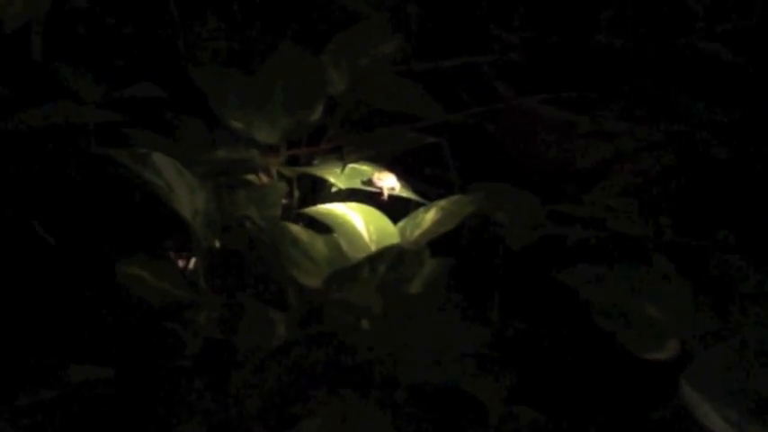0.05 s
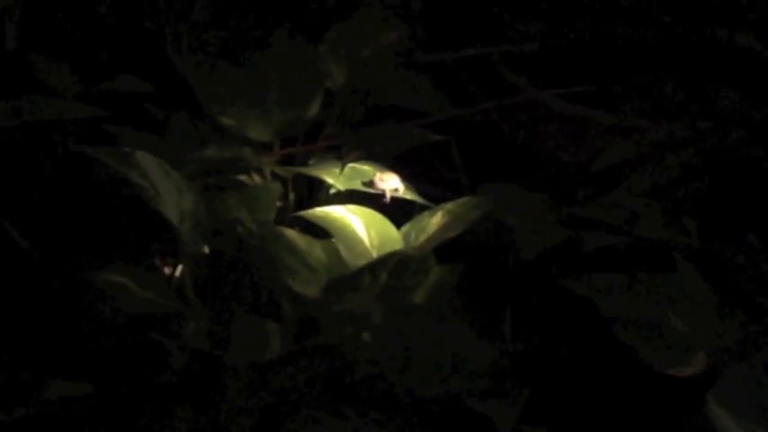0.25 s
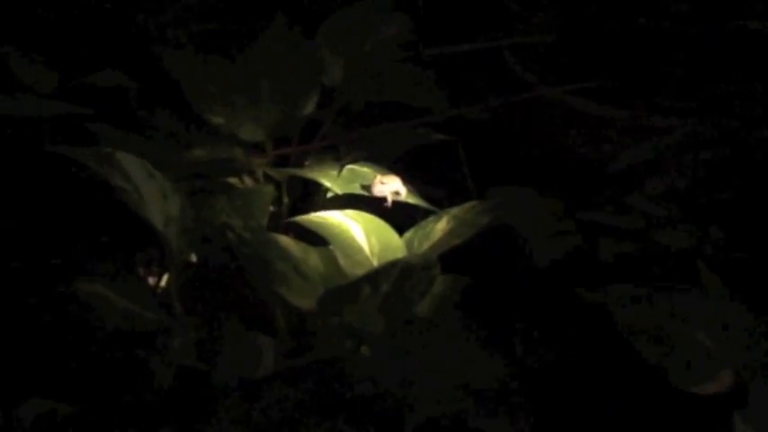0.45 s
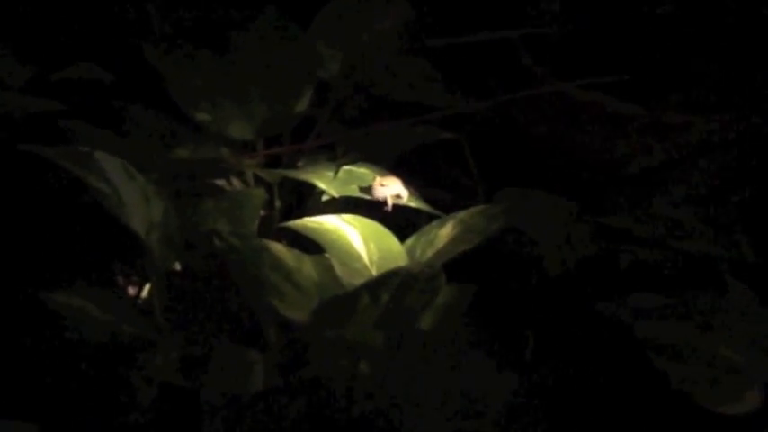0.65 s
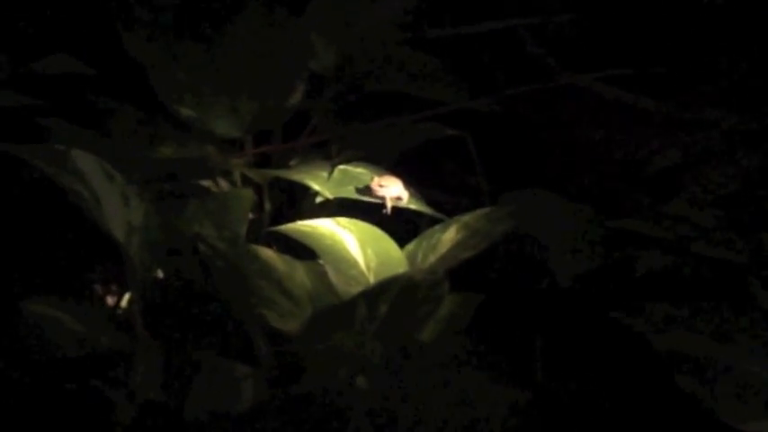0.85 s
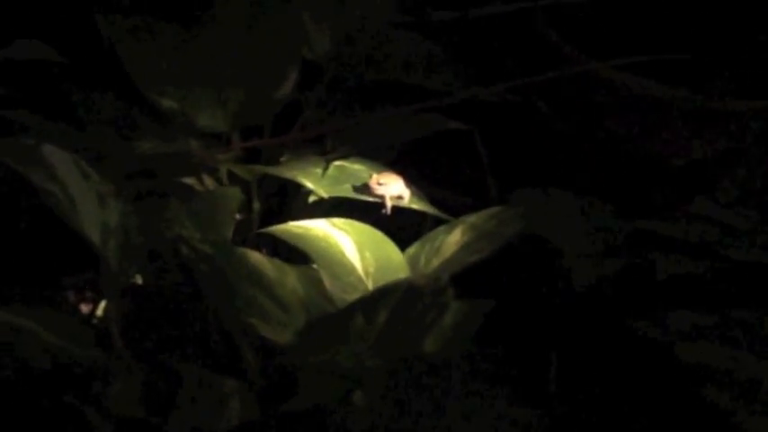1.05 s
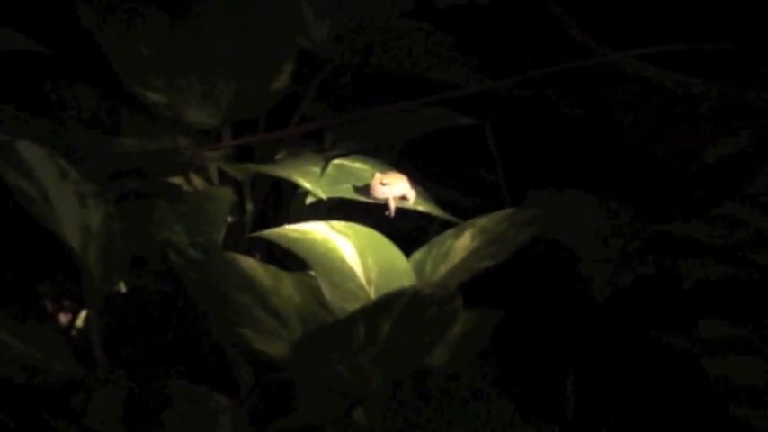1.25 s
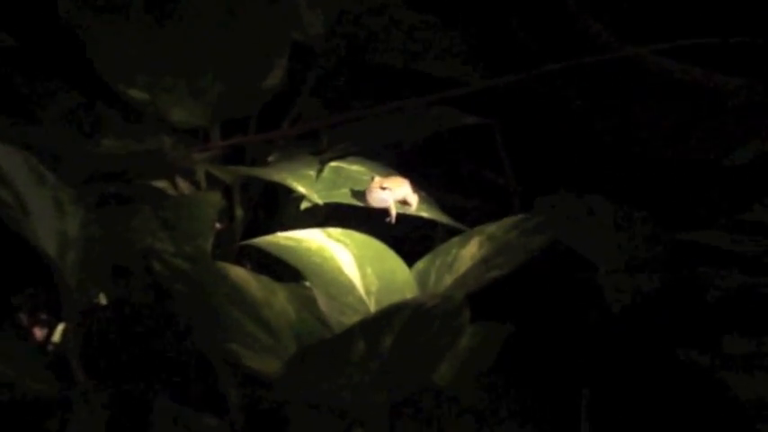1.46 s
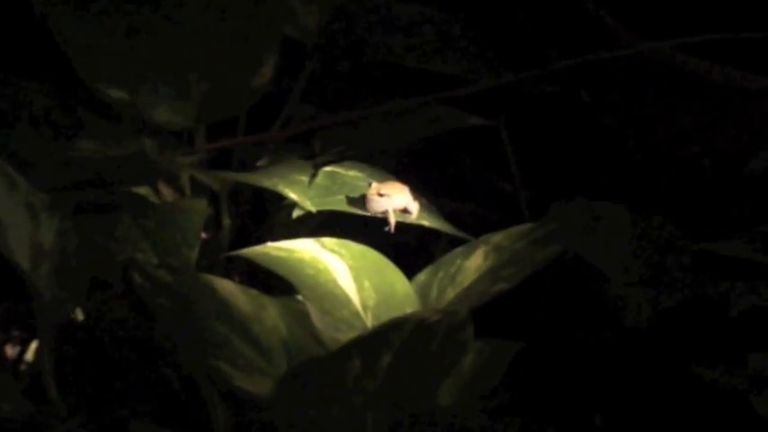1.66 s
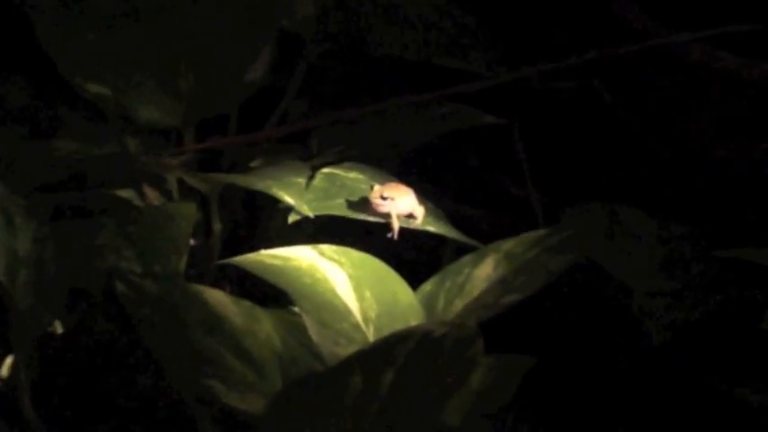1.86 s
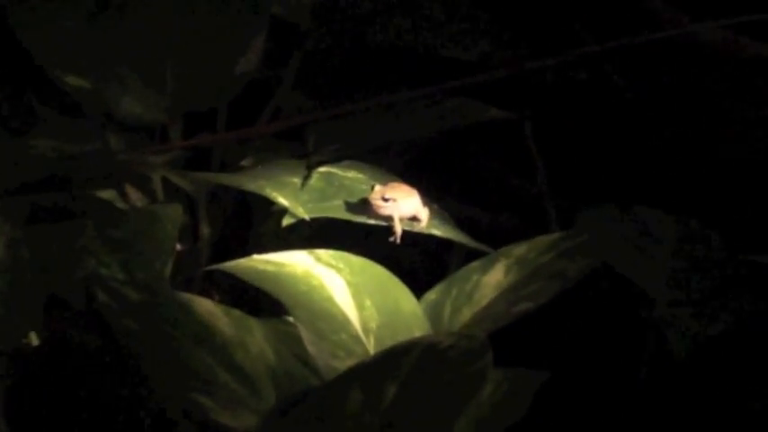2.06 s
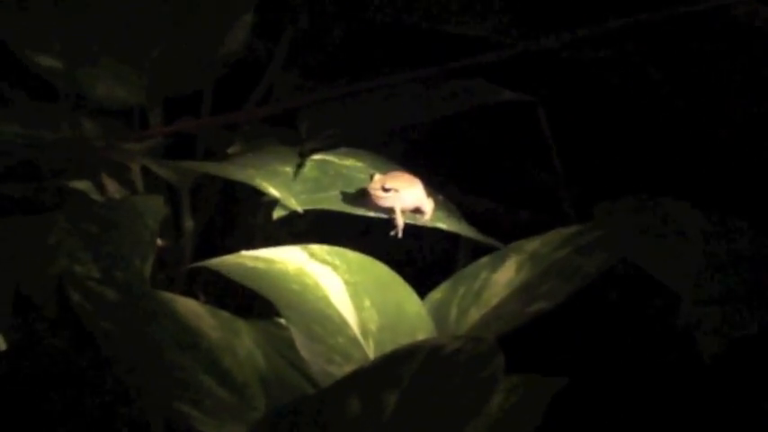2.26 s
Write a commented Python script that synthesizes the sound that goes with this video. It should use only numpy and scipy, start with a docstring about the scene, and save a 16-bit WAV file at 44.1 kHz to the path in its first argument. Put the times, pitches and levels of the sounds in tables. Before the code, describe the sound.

A small tree frog close to the microphone whistles at about 0.25 s: a brief low note snaps up into a longer, rising high one. A neighbour farther off answers at 0.6 s with a higher top note and echoes. The near frog repeats at 1.2 s, the answer at 1.8 s. Faint distant frogs, high insect buzz and soft night hiss continue throughout; a faint wavering low hum fades by 1.45 s.

```python
"""Night in a garden: far frogs call throughout, blurred by foliage, over hiss, a distant chorus and an insect's buzz.
A far hum wavers from the start and dies away in the second half; it is a sine with moving pitch and level.
Soon a tree frog on a leaf near the microphone whistles: a low note flicks up into a high, rising one.
A neighbour with a higher top note answers, then both repeat; the whistles are swept sines sent through scattered echoes.
The recorder's gain ducks under the loudest whistles."""
import sys
import numpy as np
from scipy import signal
from scipy.fft import rfft, irfft
from scipy.io import wavfile
from scipy.ndimage import uniform_filter1d

SR = 44100
rng = np.random.default_rng(int(sys.argv[2]) if len(sys.argv) > 2 else 0)


def output_pcm(signal):
    """Save a mono or channel-first signal as 16-bit PCM at the path in sys.argv[1].

    Samples are clipped to [-1, 1] before scaling.
    """
    pcm = np.clip(np.atleast_2d(signal).T, -1, 1) * 32767
    wavfile.write(sys.argv[1], SR, np.round(pcm).astype(np.int16))


N = 101429


def from_db(db):
    """Decibels to gain."""
    return 10 ** (np.asarray(db) / 20)


def rms_one(x):
    """Scale to unit power."""
    return x / np.sqrt(np.mean(x ** 2) + 1e-20)


def in_time(rows):
    """Join (t/s, value) points by straight lines."""
    return np.interp(np.arange(N) / SR, *np.transpose(rows))


def add(out, start_s, x):
    """Mix x into out from start_s, which may lie before the start."""
    i = int(round(start_s * SR))
    x = x[max(-i, 0):max(len(out) - i, 0)]
    out[max(i, 0):max(i, 0) + len(x)] += x


def resonate(x, hz, width_hz):
    """A two-pole resonance applied twice, for steep skirts."""
    r = np.exp(-np.pi * width_hz / SR)
    gain = (1 - r * r) / 2
    section = [gain, 0, -gain, 1, -2 * r * np.cos(2 * np.pi * hz / SR), r * r]
    return signal.sosfilt([section, section], x)


def smooth(x, seconds):
    """One-pole lag."""
    r = np.exp(-1 / (seconds * SR))
    return signal.lfilter([1 - r], [1, -r], x)


def drift(seconds):
    """Slow random wandering with spread 1."""
    noise = rng.standard_normal(N + SR)
    return rms_one(smooth(smooth(noise, seconds), seconds)[SR:])


def night_air():
    """Soft, even outdoor hiss: noise coloured in the spectrum."""
    # colour of the hiss: f/Hz, relative level/dB
    air_colour = [(25, -23.5), (70, -10), (140, -9.5), (270, -1.5), (350, -3), (600, -3.5), (1000, -6),
                  (1600, -8.5), (2800, -4.5), (5000, -13.5), (8500, -16.5), (10800, -25.5)]
    air_db = -50
    hz, db = np.transpose(air_colour)
    bin_hz = np.arange(N // 2 + 1) * SR / N
    colour = from_db(np.interp(np.log(bin_hz + 1), np.log(hz), db))
    return from_db(air_db) * rms_one(irfft(rfft(rng.standard_normal(N)) * colour, N))


def chorus():
    """Countless distant frogs and insects merge into narrow bands of noise."""
    # bands of the distant chorus: f/Hz, width of each filter pass/Hz, level/dB
    chorus_bands = [(2067, 140, -53.5), (3600, 490, -53.5), (4020, 730, -57), (7020, 320, -62)]
    out = np.zeros(N)
    for hz, width_hz, db in chorus_bands:
        out += from_db(db) * rms_one(resonate(rng.standard_normal(N), hz, width_hz))
    return out


def far_hum():
    """A faint low tone, one sine, wavers and dies away."""
    # glide of the hum: t/s, f/Hz
    hum_pitch = [(0, 397.5), (.2, 412.5), (.35, 422), (.6, 413), (.8, 400.5), (1.0, 399.5), (1.45, 377)]
    # wavering of the hum, before the closing fade: t/s, level/dB
    hum_level = [(0.0, -48), (0.152, -57.5), (0.176, -77), (0.222, -51.5), (0.27, -64.5), (0.346, -52),
                 (0.402, -69), (0.436, -53.5), (0.608, -78.5), (0.63, -57.5), (0.856, -47.5), (0.92, -58),
                 (1.012, -47), (1.126, -61.5), (1.182, -50.5), (1.364, -88), (1.388, -62), (1.45, -77)]
    fade = np.clip((hum_level[-1][0] - np.arange(N) / SR) * 20, 0, 1)
    phase = 2 * np.pi * np.cumsum(in_time(hum_pitch)) / SR
    return np.sqrt(2) * fade * from_db(in_time(hum_level)) * np.sin(phase)


def insect():
    """A very regular, slowly easing train of wing strokes rings three high resonances."""
    # pace of the wings: t/s, pulses per second
    stroke_rate = [(0, 136.15), (.6, 135.65), (1.2, 135.3), (2.3, 134.75)]
    # resonances: f/Hz, width of each filter pass/Hz, relative level at start/dB, at end/dB
    body_resonances = [(6620, 230, -8.5, -3), (6942, 300, -2.5, -1), (7300, 330, 1.5, -2.5)]
    # slow swell of the buzz: t/s, relative level/dB
    buzz_swell = [(0, -0.5), (.2, 3.5), (.55, -3), (1.1, 1), (1.55, -2.5), (1.85, -0.5), (2.3, 2)]
    buzz_db, jitter_s, waver_db = -53, .000004, -1.7
    place = dict(reflections=[], direct_db=-7, early_db=-9, late_db=-5, early_t60=0.14, late_t60=1)

    strokes = np.cumsum(in_time(stroke_rate)) / SR
    at = np.interp(np.arange(1, int(strokes[-1])), strokes, np.arange(N))
    at = np.clip(at + jitter_s * SR * rng.standard_normal(len(at)), 0, N - 2)
    # share each click between two samples, to place it between them
    clicks, i = np.zeros(N), at.astype(int)
    clicks[i], clicks[i + 1] = 1 - at % 1, at % 1

    wings = np.zeros(N)
    for k, (hz, width_hz, start_db, end_db) in enumerate(body_resonances):
        level = from_db(np.linspace(start_db, end_db, N) + waver_db * drift(0.03))
        polarity = (-1) ** k
        wings += polarity * level * resonate(clicks + 1e-18, hz, width_hz)
    return from_db(buzz_db + in_time(buzz_swell)) * rms_one(foliage(wings, place)[:N])


def foliage(x, place):
    """The direct sound, scatter from near leaves, a longer tail from the trees and one far echo."""
    reflections_per_s, first_reflection_s = 660, 0.0039
    echo_s, echo_db, echo_spread_s = .235, -33.5, 0.023
    t = np.arange(SR) / SR
    response = np.zeros(SR)
    for stage in ("early", "late"):
        present = (rng.random(SR) < reflections_per_s / SR) * (t > first_reflection_s)
        hits = rng.standard_normal(SR) * present
        scatter = hits * from_db(-60 * t / place[stage + "_t60"])
        energy = np.sum(scatter ** 2)
        response += from_db(place[stage + "_db"]) * scatter / np.sqrt(energy + 1e-20)
    response[0] += from_db(place["direct_db"])
    for delay_s, db in place["reflections"]:
        response[int(delay_s * SR)] += from_db(db)
    # the far echo is smeared in time
    echo = rng.standard_normal(SR) * np.exp(-t / echo_spread_s)
    add(response, echo_s, from_db(echo_db) * echo / np.sqrt(np.sum(echo ** 2)))
    return signal.fftconvolve(x, response)


def wobble(count, frog):
    """Quick random unsteadiness of pitch, in Hz."""
    time_scale_s = 0.0009
    noise = rng.standard_normal(count)
    return frog["wobble_hz"] * rms_one(smooth(smooth(noise, time_scale_s), time_scale_s))


def low_note(hz, length_s, frog):
    """A steady whistle that swells, then strains, splits and flicks upward as it stops."""
    # levels of harmonics 2 to 5, relative to the fundamental: level/dB
    overtones_db = [-20, -34.5, -54.5, -51.5]
    attack_s, release_s = .002, .0035
    strain_db, strain_s = 17.5, .005  # lift of the second harmonic just before and after the jump
    undertone_db, undertone_s = -20, .008
    t = np.arange(SR // 2) / SR
    flick = .5 + .5 * np.tanh((t - length_s) / frog["flick_s"])
    pitch = hz + frog["flick_hz"] * flick + wobble(len(t), frog)
    phase = 2 * np.pi * np.cumsum(pitch) / SR

    swell = from_db(-frog["low_swell_db"] * np.exp(-t / frog["swell_s"]))
    release = .5 - .5 * np.tanh((t - length_s) / release_s)
    level = (1 - np.exp(-t / attack_s)) * swell * release

    strain = strain_db * np.exp(-((t - length_s - strain_s / 2) / strain_s) ** 2)
    voice = np.sin(phase)
    for k, db in enumerate(overtones_db, 2):
        voice += from_db(db + strain * (k == 2)) * np.sin(k * phase)
    # the voice splits: a partial at one and a half times the pitch grows towards the jump
    split = np.exp(np.minimum(t - length_s, 0) / undertone_s) * np.sin(1.5 * phase)
    return np.sqrt(2) * level * (voice + from_db(undertone_db) * split)


def snap():
    """A brief rough burst of band-limited noise where the voice breaks upward."""
    low_hz, high_hz, peak_s = 2460, 4350, 0.0033
    t = np.arange(SR // 10) / SR
    burst = 2 * rng.standard_normal(len(t)) * t / peak_s * np.exp(1 - t / peak_s)
    band = signal.butter(8, [low_hz, high_hz], "band", fs=SR, output="sos")
    return signal.sosfilt(band, burst)


def high_note(hz, length_s, frog):
    """A whistle that leaps up, creeps to its top pitch, and sags as the air runs out."""
    attack_s, release_s, rise_s, scoop_s = .003, 0.0059, 0.0066, .034
    sag_s, fade_db, peak_share = .045, 11, 0.67  # the swell ends at this share of the length
    t = np.arange(SR // 2) / SR
    spent = np.clip((t - length_s + sag_s) / sag_s, 0, 1)
    pitch = hz - frog["rise_hz"] * np.exp(-t / rise_s)
    pitch = pitch - frog["scoop_hz"] * np.exp(-t / scoop_s) - frog["sag_hz"] * spent
    # half as unsteady as the low note
    phase = 2 * np.pi * np.cumsum(pitch + wobble(len(t), frog) / 2) / SR

    swell_db = -frog["high_swell_db"] * np.maximum(1 - t / (peak_share * length_s), 0)
    attack = (1 - np.exp(-t / attack_s)) ** 2
    release = np.exp(-np.maximum(t - length_s, 0) / release_s)
    level = from_db(swell_db - fade_db * spent) * attack * release
    return np.sqrt(2) * level * np.sin(phase)


def frog_calls(calls, frog):
    """Each call is a low note snapping into a high one, heard through the foliage."""
    lead_s = 1  # calls may start this long before time zero
    out = np.zeros(N + lead_s * SR)
    for start_s, low_hz, low_s, low_db, high_hz, high_s, high_db in calls:
        call = from_db(low_db) * low_note(low_hz, low_s, frog)
        add(call, low_s, from_db(low_db + frog["snap_db"]) * snap())
        add(call, low_s, from_db(high_db) * high_note(high_hz, high_s, frog))
        add(out, lead_s + start_s, call)
    return foliage(out, frog)[lead_s * SR:][:N]


# Each frog's settings: _hz in Hz, _s and _t60 in seconds, _db in dB; the last lines describe its place.
def far_frogs():
    """Frogs far off, and the tail of the neighbour's call from just before the start: scattered sound outweighs
    the direct, which blurs their calls."""
    # calls before foliage: t/s, low f/Hz, low length/s, low level/dB, high f/Hz, high length/s, high level/dB;
    # the first row is the neighbour's call from before the start, heard blurred like the far ones
    far_calls = [(-.25, 2110, 0.042, -32.5, 4120, 0.21, -34.5), (-.03, 1990, 0.064, -41, 3600, 0.17, -35),
                 (.44, 1975, .07, -44, 3480, 0.13, -54.5), (.87, 2020, 0.1, -53, 3688, .19, -42.5),
                 (1.05, 1980, 0.063, -41.5, 3600, 0.15, -38), (1.36, 2085, 0.055, -67, 4130, 0.14, -39.5),
                 (1.52, 1960, 0.062, -63.5, 3470, 0.27, -43.5),
                 (2.075, 1985, 0.051, -39.5, 3590, 0.33, -36)]
    frog = dict(
        low_swell_db=7, swell_s=0.016, flick_hz=80, flick_s=.005, wobble_hz=25.8, snap_db=-24,
        high_swell_db=9, rise_hz=294, scoop_hz=224, sag_hz=80.6,
        reflections=[], direct_db=-7.5, early_db=-6.5, late_db=-7.5, early_t60=.45, late_t60=1)
    return frog_calls(far_calls, frog)


def neighbour_frog():
    """A frog some way off answers with a higher top note, its level swelling and dipping."""
    # calls before foliage: t/s, low f/Hz, low length/s, low level/dB, high f/Hz, high length/s, high level/dB
    neighbour_calls = [(.618, 2094, .050, -19.5, 4066, 0.18, -23),
                       (1.821, 2092, .050, -17.5, 4103, 0.18, -19.5)]
    # distinct reflections off the ground and nearby plants: delay t/s, level/dB
    neighbour_reflections = [(.011, -10.5), (.027, -11.5), (.046, -16.5), (.074, -11.5), (.108, -16.5)]
    # swells and dips of the answers: t/s, relative level/dB
    answer_swell = [(.69, 1.5), (.72, -1.5), (.79, 2), (.808, -5), (.82, 1), (.92, 2), (1.0, -2.5),
                    (1.82, -0.5), (1.89, 1), (1.915, -5), (1.95, 1), (1.957, 0), (2.03, 2), (2.1, -4),
                    (2.3, -3.5)]
    frog = dict(
        low_swell_db=18, swell_s=.035, flick_hz=330, flick_s=.007, wobble_hz=22, snap_db=-19,
        high_swell_db=4.5, rise_hz=400, scoop_hz=269, sag_hz=212.7,
        reflections=neighbour_reflections, direct_db=-3,
        early_db=-6, late_db=-9.5, early_t60=0.61, late_t60=.85)
    return from_db(in_time(answer_swell)) * frog_calls(neighbour_calls, frog)


def near_frog():
    """The frog on the leaf, close to the microphone: direct sound well above its reflections."""
    # calls before foliage: t/s, low f/Hz, low length/s, low level/dB, high f/Hz, high length/s, high level/dB
    near_calls = [(.234, 2085, .068, -11, 3788, 0.19, -6.5), (1.194, 2083, .070, -10.5, 3778, .206, -6.5)]
    # distinct reflections off the ground and nearby plants: delay t/s, level/dB
    near_reflections = [(.00815, -21.5), (.0139, -19.5), (.0211, -25), (.03115, -19), (.0451, -21.5),
                        (.0628, -23.5)]
    frog = dict(
        low_swell_db=7, swell_s=.018, flick_hz=170, flick_s=0.0042, wobble_hz=6.2, snap_db=-16.5,
        high_swell_db=8, rise_hz=516, scoop_hz=218, sag_hz=128,
        reflections=near_reflections, direct_db=-1,
        early_db=-21, late_db=-18.5, early_t60=0.41, late_t60=0.57)
    return frog_calls(near_calls, frog)


def scene():
    """Frogs near and far over the night background."""
    background = night_air() + chorus() + far_hum() + insect()
    frogs = far_frogs() + neighbour_frog() + near_frog()
    return (background + frogs)[None]


def record(dry):
    """Gain control ducks quickly under loud whistles and recovers slowly; the top is cut."""
    threshold_db, attack_s, release_db_per_s = -12.5, 0.0021, 64
    level_db = 10 * np.log10(uniform_filter1d(dry[0] ** 2, size=128) + 1e-12)
    excess_db = np.maximum(level_db - threshold_db, 0)
    # hold the largest excess while it recovers at a steady rate
    recovery_db = release_db_per_s * np.arange(N) / SR
    duck_db = np.maximum.accumulate(excess_db + recovery_db) - recovery_db
    ducked = dry * from_db(-smooth(duck_db, attack_s))
    low_pass = signal.ellip(12, .1, 80, 10900, fs=SR, output="sos")  # passband edge in Hz
    return signal.sosfilt(low_pass, ducked)


dry = scene()
out = record(dry)
output_pcm(out)
```